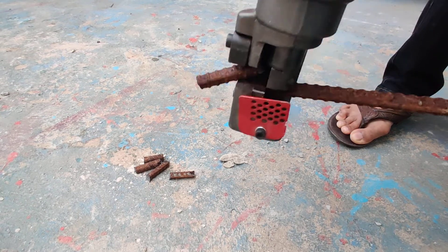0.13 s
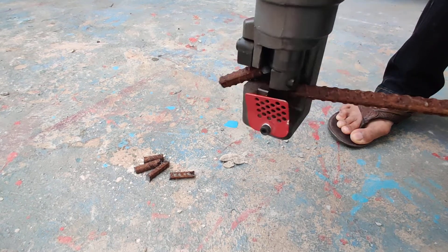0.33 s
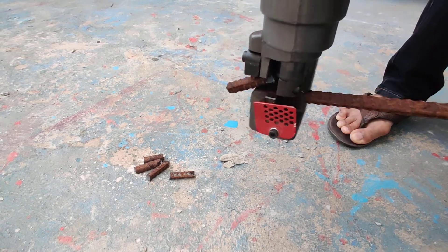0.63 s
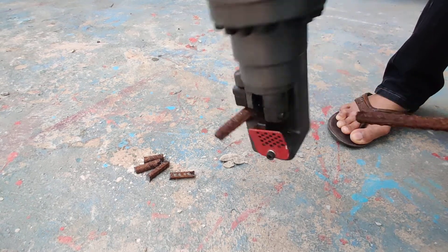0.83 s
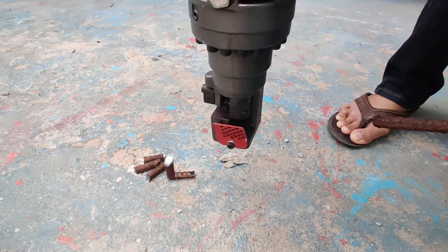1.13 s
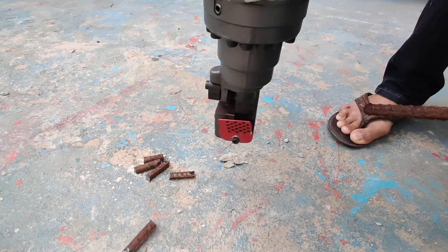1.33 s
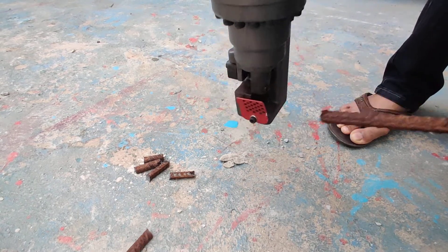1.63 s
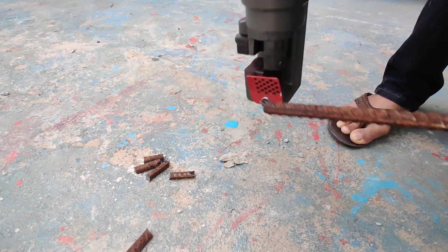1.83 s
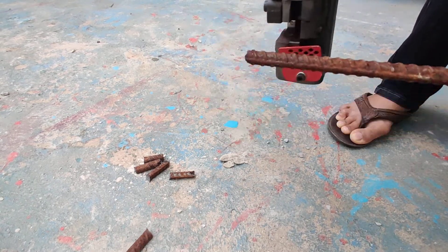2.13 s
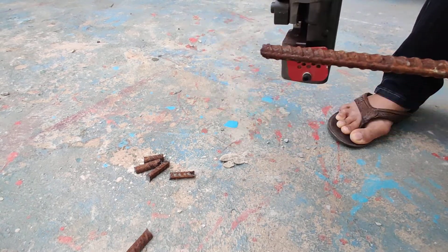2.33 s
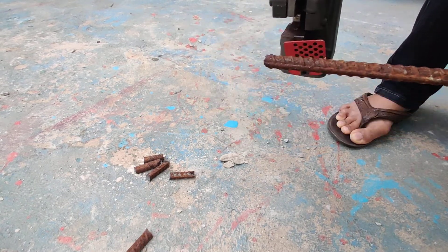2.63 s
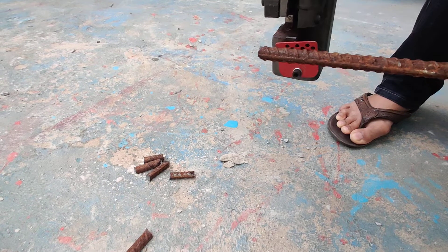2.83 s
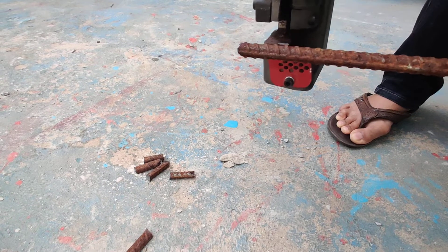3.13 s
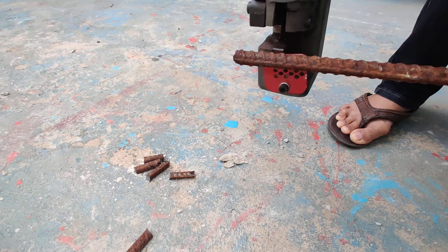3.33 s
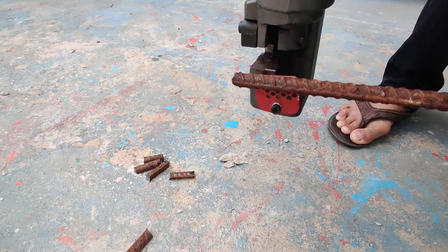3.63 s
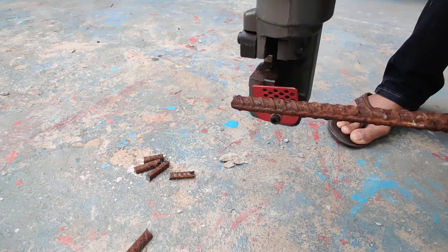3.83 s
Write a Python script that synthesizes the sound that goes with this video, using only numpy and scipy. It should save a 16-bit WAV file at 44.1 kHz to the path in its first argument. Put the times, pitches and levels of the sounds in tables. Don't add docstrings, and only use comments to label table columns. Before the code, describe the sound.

Close stereo phone pickup in an open concrete yard: gritty cutter motor halts quickly, air sighs softly, a small cut bar clinks twice with very high ringing, then a click and chirp bring the loud whine back.

```python
import sys
import numpy as np
from scipy import signal
from scipy.fft import rfft, irfft
from scipy.io import wavfile
from scipy.ndimage import uniform_filter1d

SR = 44100
rng = np.random.default_rng(int(sys.argv[2]) if len(sys.argv) > 2 else 0)


def how_loud(loudness_db):
    steps = np.asarray(loudness_db, float) / 20
    return 10 ** steps


def materialize(psi):
    bounded = np.clip(np.atleast_2d(psi).T, -1, 1)
    quanta = np.round(bounded * 32767).astype(np.int16)
    wavfile.write(sys.argv[1], SR, quanta)


N = 176400

ARMATURE_HZ, GEAR_HZ = 381.9, 97.22
BRAKE_S, BRAKE_LEN_S, BRAKE_POWER = 0.15, 0.184, 3.4
START_S, SPIN_UP_S = 2.147, 0.034
OVERSHOOT, SETTLE_S = 0.009, 0.35
LEFT_LEADS_S = 4.2e-5

# turn_multiple, level_db, resonance_hz, width_hz, resonance_gain_db
ARMATURE_ORDERS = [(1, -37.5, 180, 220, -22), (4, -41, 1000, 250, 3), (16, -44, 3500, 3450, 30),
                   (23, -42, 5400, 2000, 13)]
# turn_multiple, level_db, resonance_hz, width_hz, resonance_gain_db
BRAKING_ORDERS = [(1, -39, 200, 100, -9), (4, -40, 920, 260, 21), (23, -41, 4400, 900, 5),
                  (16, -50, 3700, 1700, 35), (14, -52, 4400, 800, 35)]
# turn_multiple, level_db
GEAR_ORDERS = [(12, -43.5), (15, -39.5), (16, -42.5), (18, -43), (22, -40), (24, -34), (27, -38), (31, -41),
               (33, -44), (34, -48), (35, -41.5), (37, -32.5), (38, -35.5), (39, -41), (41, -37),
               (42, -40.5), (43, -37.5), (44, -33.5), (45, -37), (46, -38), (47, -36.5), (48, -45),
               (49, -38), (50, -36.5), (51, -43), (53, -43), (55, -45), (80, -46), (83, -42), (120, -45)]
# pitch_hz, level_db
MAINS_HUM = [(404, -52), (500.6, -49)]
# time_s, level_db
RUN_DOWN, RESTART = [
    [(0.0, -17), (0.292, -21), (0.342, -38), (0.36, -45)],
    [(2.13, -47), (2.145, -35), (2.156, -23), (2.173, -15.5), (2.2, -17), (2.394, -19.5), (2.864, -18),
     (3.88, -19), (4.0, -21)],
]
# pitch_hz, density_db
BRUSH_HISS = [(120, -56), (200, -38), (379, -21), (732, -20.5), (1490, -11), (3220, -5.5), (3800, -3),
              (5680, -9), (15800, -19.5)]
# pitch_hz, width_hz, gain_db
HOUSING = [(990, 265, 6), (2230, 1330, 4), (3600, 200, 0), (4570, 970, 5), (7760, 760, 6),
           (12090, 1160, 8.5), (14650, 1900, 11)]
# pitch_hz, likeness_0_to_1
PORT_LIKENESS = [(170, .9), (430, .9), (700, .65), (1100, .8), (1460, .5), (1900, .75), (3100, .4),
                 (4000, .55), (5000, .2), (15000, .15)]
# pitch_hz, left_minus_right_db
PORT_LEAN = [(170, -2), (700, -1), (950, -3.5), (1460, 2), (2200, -2), (4500, 3), (7300, -8), (10300, -2.5),
             (12400, -6.5), (15000, -4)]
# time_s, level_db
WIND_LEVEL = [(0.0, -40.5), (0.34, -45.5), (0.38, -40), (0.97, -37), (1.27, -32.5), (1.5, -40), (1.89, -36),
              (2.32, -43), (3.85, -40.5), (4.0, -46)]
# pitch_hz, density_db
WIND_SPECTRUM = [(12, -29.5), (20, 5.5), (70, -6), (102, -5.5), (258, -17.5), (292, -25), (400, -23.5),
                 (520, -45), (880, -120)]
# pitch_hz, side_minus_mid_db
DIFFUSE_SIDE = [(60, -12), (110, -14), (200, -10.5), (380, -6.5), (700, -1.5), (1290, 2.5), (2380, -1),
                (4400, 1), (8120, 0.5), (15000, 2)]
# start_s, peak_db, left_minus_right_db, lowest_hz, highest_hz
TICKS = [(0.126, -6, 9, 3500, 8500), (.331, -28, 0, 1600, 2700), (0.5642, -32, -7, 4000, 9450),
         (0.9085, -42, 4, 2200, 6600), (0.9214, -41, -3, 2200, 6600), (1.067, -28.5, 6, 2200, 5200),
         (1.085, -24, 7, 500, 5300), (2.088, -43, -7, 2200, 6600), (2.0981, -34, -6, 2200, 6600),
         (2.1231, -39, -8, 1500, 3000), (2.138, -21, -6, 1600, 5000)]
# start_s, peak_db, left_minus_right_db, lowest_hz, highest_hz
BAR_HITS = [
    (1.2516, -8, 0.5, 350, 8700),
    (1.4005, -12, 3, 1000, 9500),
    (1.4151, -9, -4.5, 4200, 8900),
    (1.4233, -26, -6, 2500, 10000),
    (1.489, -27, -11.5, 2600, 9000),
]
# start_s, pitch_hz, level_db, fade_s (per 60 dB)
CLUNKS = [(.3, 990, -27, 0.06), (.306, 650, -33, .08), (.316, 890, -32, 0.03), (.325, 500, -40, .1),
          (.33, 3950, -44, .5), (.335, 4530, -46, .4), (1.09, 978, -42, 0.1), (1.094, 95, -28, .4),
          (1.1, 190, -36, .3), (1.252, 650, -28, 0.05), (1.252, 60, -27, .2), (2.153, 1010, -26, .06)]
# start_s, attack_s, fade_s (per 60 dB), level_db
SIGHS = [
    (1.066, 0.0048, 1.5, -36.5),
    (1.7, 0.086, 1.8, -48),
    (1.96, 0.032, .5, -47.5),
    (0.307, 0.009, 1.63, -39.5),
]
# pitch_hz, density_db
VALVE_SPECTRUM = [(180, -17), (300, -3), (723, -9.5), (1010, -4), (1130, -12), (2020, -13), (5740, -21),
                  (15800, -37)]
# pitch_hz, density_db
ECHO_SPECTRUM = [(350, -51), (600, -8), (697, -2.5), (800, -9), (1170, -13.5), (1630, -6.5), (4310, -2.5),
                 (15800, -37)]
# pitch_hz, density_db
YARD_SPECTRUM = [(150, -35), (250, -6), (761, -14.5), (1650, -20), (3620, -24.5), (4220, -23.5),
                 (6050, -32.5), (15000, -38)]
# start_s, level_db, beat_s, fade_s (per 60 dB)
BAR_RINGS = [
    (1.068, -51, .12, .6),
    (1.257, -18.5, 0.05, 0.36),
    (1.4015, -27, .009, .1),
    (1.417, -10.5, 0.066, .46),
]
# time_s, left_minus_right_db
TUMBLE_PAN = [(1.25, 6), (1.292, 10), (1.33, -6.5), (1.378, 6.5), (1.4, -2), (1.476, -3), (1.488, -.5),
              (1.516, 19.5), (1.538, 16.5), (1.584, -5.5), (1.626, 9.5), (1.662, 6), (1.73, 18), (1.85, 3)]


def curve(table, off=-120.0):
    rows = np.array(table, float)
    return np.interp(np.arange(N) / SR, rows[:, 0], rows[:, 1], left=off, right=off)


def over_hz(table):
    rows = np.array(table, float)
    log_hz = np.log(np.fft.rfftfreq(N, 1 / SR) + 1)
    return np.interp(log_hz, np.log(rows[:, 0]), rows[:, 1])


def colour(x, gain):
    y = irfft(rfft(x) * gain, N)
    return y / np.sqrt(np.mean(y ** 2))


def walk(rate_hz):
    k = int(SR / rate_hz)
    steps = np.repeat(rng.standard_normal(N // k + 1), k)
    return 1.297 * uniform_filter1d(uniform_filter1d(steps, k), k)[:N]


def pan(x, lean_db):
    return np.array([x * how_loud(lean_db / 2), x * how_loud(-lean_db / 2)])


def airy(spectrum, flicker_db):
    hz = np.fft.rfftfreq(N, 1 / SR) + 1
    mid, side = (rfft(rng.standard_normal(N)) * how_loud(over_hz(spectrum)) for _ in range(2))
    side = side * how_loud(over_hz(DIFFUSE_SIDE))
    both = np.array([mid + side, mid - side])
    out = 0
    for octave in range(5, 15):
        share = np.cos(np.pi / 2 * np.clip(np.log2(hz) - octave, -1, 1)) ** 2
        out = out + irfft(both * share, N) * how_loud(flicker_db * walk(8.94))
    return out / np.sqrt(np.mean(out.mean(0) ** 2))


def speed():
    t = np.arange(N) / SR
    down = 1 - (np.clip(t - BRAKE_S, 0, None) / BRAKE_LEN_S) ** BRAKE_POWER
    on = np.clip(t - START_S, 0, None)
    up = (1 - np.exp(-on / SPIN_UP_S)) * (1 + OVERSHOOT * np.exp(-on / SETTLE_S))
    share = np.clip(np.where(t < 1, down, up), 0.02, None)
    return share * (1 + 0.0006 * walk(12))


def resonance(hz, centre_hz, width_hz):
    return 1 / (1 + ((hz - centre_hz) / (width_hz / 2)) ** 2)


def whine(share):
    t, turns = np.arange(N) / SR, np.cumsum(share) / SR
    stopping = t < 1
    awake = np.clip((share - 0.35) / 0.045, 0, 1)
    mesh_from, mesh_range = np.where(stopping, 0.78, 0.87), np.where(stopping, 0.12, 0.013)
    mesh = np.clip((share - mesh_from) / mesh_range, 0, 1)
    lines = []  # cycles, gain, wobble_db
    for table, on in ((BRAKING_ORDERS, stopping), (ARMATURE_ORDERS, ~stopping)):
        for order, db, res_hz, width_hz, gain_db in table:
            swell_db = gain_db * resonance(order * ARMATURE_HZ * share, res_hz, width_hz)
            lines.append((order * ARMATURE_HZ * turns, on * awake * how_loud(db + swell_db), 2.0))
    for order, db in GEAR_ORDERS:
        gain = how_loud(db + 1.5 - 6 * stopping) * mesh
        lines.append((order * GEAR_HZ * turns, gain, 2.2))
    tooth_hz = 40 * GEAR_HZ
    tooth_db = -22 + 6 * resonance(tooth_hz * share, 3500, 300)
    lines.append((tooth_hz * turns, mesh * how_loud(tooth_db), 0.6))
    pump_load = np.clip((t - 2.75) / 0.5 + 1, 0.1, 1)
    lines.append((3 * GEAR_HZ * turns, how_loud(-46.5) * pump_load, 1.2))
    for hz, db in MAINS_HUM:
        lines.append((hz * t, how_loud(db) * mesh, 2.2))
    out = 0
    for cycles, gain, wobble_db in lines:
        end_hz = (cycles[-1] - cycles[-2]) * SR
        half_lag = min(np.pi * end_hz * LEFT_LEADS_S, 0.55) * (1 + 0.16 * wobble_db * walk(2.14))
        phase = 2 * np.pi * (cycles + rng.random())
        tone = np.array([np.sin(phase + half_lag), np.sin(phase - half_lag)])
        out = out + tone * gain * how_loud(20.5 + wobble_db * walk(6.965)) * pan(0.96, 2.5 * walk(3))
    return out


def motor():
    share = speed()
    level = how_loud(np.maximum(curve(RUN_DOWN), curve(RESTART)))
    hz = np.fft.rfftfreq(N, 1 / SR)
    body = how_loud(over_hz(BRUSH_HISS) + sum(db * resonance(hz, f, w) for f, w, db in HOUSING))
    clatter_body = body / (1 + (1800 / (hz + 1)) ** 2)
    gear = GEAR_HZ * np.cumsum(share) / SR
    pump = 1 + 0.18 * np.cos(2 * np.pi * 3 * gear)
    pulse = pump * (1 + 0.08 * np.cos(2 * np.pi * gear))
    unloaded = np.arange(N) < SR
    rough = []
    for tooth in rng.standard_normal((2, 320)):
        clatter = np.interp(gear % 1, np.arange(320) / 319, tooth) * how_loud(2.0 * walk(15))
        flicker_db = (1.12 + 1.0 * unloaded) * walk(300) + 0.62 * walk(18)
        grain = rng.standard_normal(N) * how_loud(flicker_db) * pulse
        rough.append(rfft(how_loud(-2.2) * colour(grain, body) + how_loud(-16) * colour(clatter, clatter_body)))
    like, lean = np.clip(over_hz(PORT_LIKENESS), 0, 1), how_loud(over_hz(PORT_LEAN) / 2)
    delay = np.exp(-2j * np.pi * hz * LEFT_LEADS_S)
    right = like * rough[0] * delay + np.sqrt(1 - like ** 2) * rough[1]
    out = 1.233 * irfft(np.array([rough[0] * lean, right / lean]), N)
    return (out + whine(share)) * level


def wind():
    return airy(WIND_SPECTRUM, 2.6) * how_loud(curve(WIND_LEVEL, off=-42.0))


def yard():
    t = np.arange(N) / SR
    running = (t < 0.33) | (t > START_S)
    return airy(YARD_SPECTRUM, 1.5) * how_loud(-50 - 10 * running)


def knock(rows, crack_s, grit_db):
    out, t = np.zeros((2, N)), np.arange(4000) / SR
    late = np.clip(t - 0.0018, 0, None)
    echo = how_loud(-9) * np.exp(-late / crack_s) * (late > 0)
    shape = np.exp(-t / crack_s) + echo + how_loud(grit_db) * np.exp(-t / 0.011)
    for at, db, lean_db, low_hz, high_hz in rows:
        burst = rng.standard_normal((2, len(t))) * shape
        burst[1] = 0.66 * burst[0] + 0.76 * burst[1]
        burst = signal.sosfilt(signal.butter(2, low_hz, "highpass", fs=SR, output="sos"), burst)
        burst = signal.sosfilt(signal.butter(6, high_hz, fs=SR, output="sos"), burst)
        i = int(at * SR)
        out[:, i:i + len(t)] += burst / np.abs(burst).max() * pan(0.98, lean_db)[:, None] * how_loud(db)
    return out


def clunks():
    t, out = np.arange(N) / SR, 0
    for at, hz, db, fade_s in CLUNKS:
        since = np.clip(t - at, 0, None)
        tone = np.sin(2 * np.pi * hz * since + 0.84 * walk(40))
        attack = np.clip(since * hz / 2, 0, 1)
        out = out + tone * attack * how_loud(db - 60 * since / fade_s)
    return out


def sighs():
    t, shapes = np.arange(N) / SR, []
    for at, attack_s, fade_s, db in SIGHS:
        rise = np.clip((t - at) / attack_s, 0, 1)
        shapes.append(how_loud(db - 60 * (t - at) / fade_s) * rise * (t > at))
    return airy(VALVE_SPECTRUM, 1.26) * sum(shapes[:3]) + airy(ECHO_SPECTRUM, 0.98) * shapes[3]


def bar_ring():
    t, out = np.arange(N) / SR, 0
    bar_hz = 15694 + 6.0 * walk(25)
    tone = np.sin(2 * np.pi * np.cumsum(bar_hz) / SR)
    ends = [row[0] for row in BAR_RINGS[1:]] + [N / SR]
    for (at, db, beat_s, fade_s), end in zip(BAR_RINGS, ends):
        since = np.clip(t - at, 0, None)
        beat = 0.16 + np.abs(np.sin(np.pi * since / beat_s)) ** 0.54
        shape = beat * how_loud(db - 60 * since / fade_s) * (t > at) * (t < end)
        out = out + pan(uniform_filter1d(shape, 128) * tone, curve(TUMBLE_PAN, off=3.0))
    return out


def squeak():
    start_s, length_s = 2.128, 0.045
    part = np.clip((np.arange(N) / SR - start_s) / length_s, 0, 1)
    pitch_hz = 8000 - 696 * part ** 2 + 80 * walk(350)
    tone = np.sin(2 * np.pi * np.cumsum(pitch_hz) / SR)
    return pan(tone * np.sin(np.pi * part) * how_loud(-37), -1.0)


def scene():
    knocks = knock(TICKS, 0.0019, -29) + knock(BAR_HITS, 0.00061, -23.5)
    ring = bar_ring()
    duck = 1 / (1 + uniform_filter1d(np.abs(ring).mean(0), 3000) / how_loud(-22))
    background = (sighs() + yard()) * duck
    return motor() + wind() + knocks + clunks() + ring + squeak() + background


def low_pass(x):
    return signal.sosfilt(signal.butter(12, 17070, fs=SR, output="sos"), x)


def record(dry):
    mix = signal.sosfilt(signal.ellip(10, 0.2, 34, 15800, fs=SR, output="sos"), dry)
    return low_pass(mix)


dry = scene()
out = record(dry)
materialize(out)
```